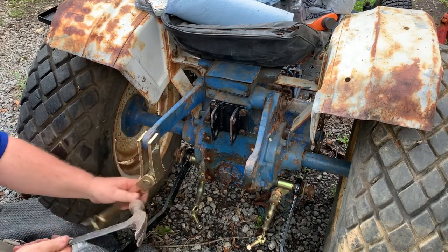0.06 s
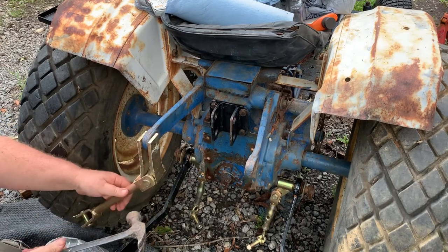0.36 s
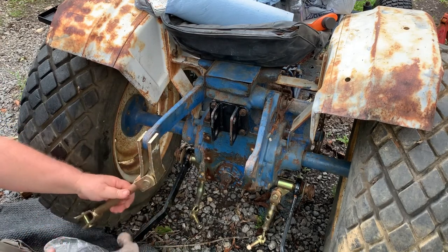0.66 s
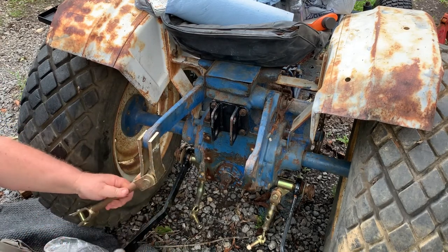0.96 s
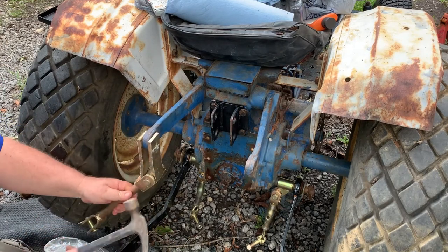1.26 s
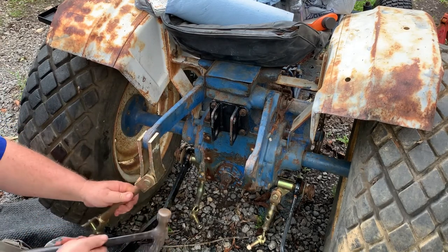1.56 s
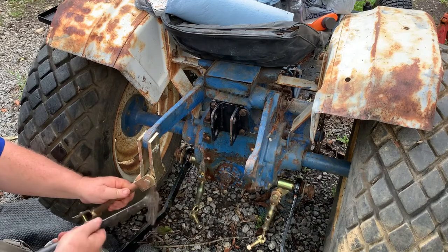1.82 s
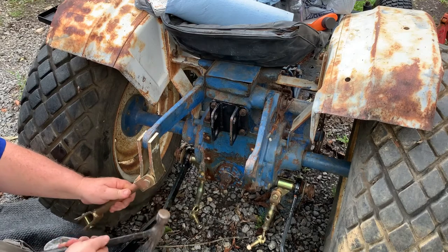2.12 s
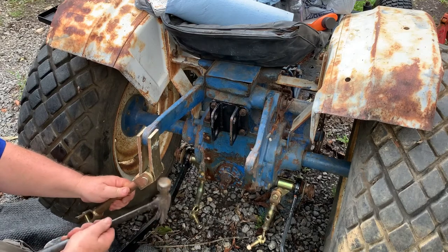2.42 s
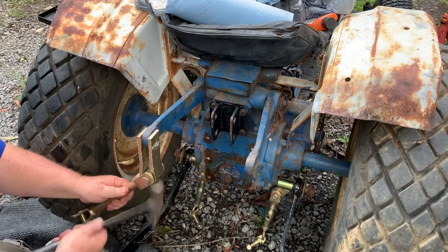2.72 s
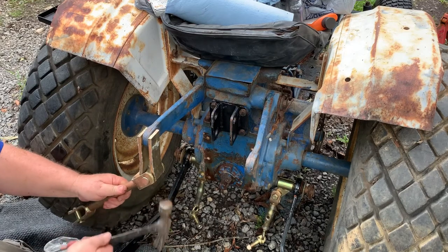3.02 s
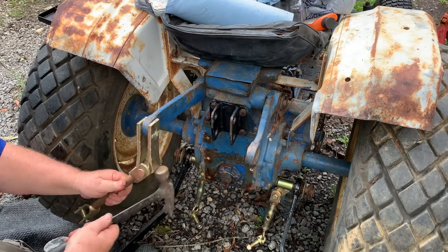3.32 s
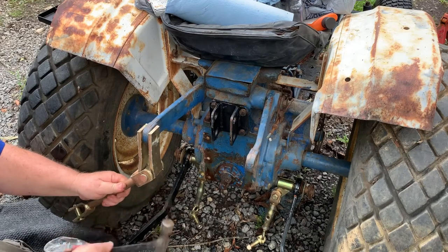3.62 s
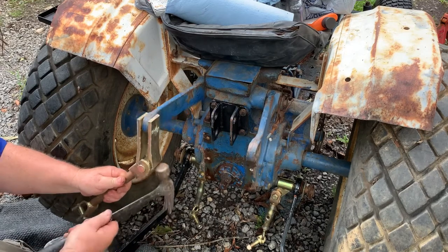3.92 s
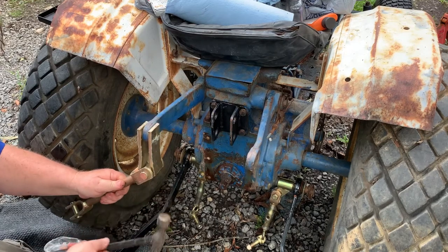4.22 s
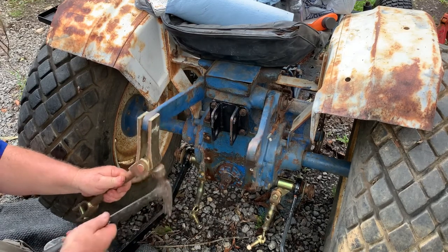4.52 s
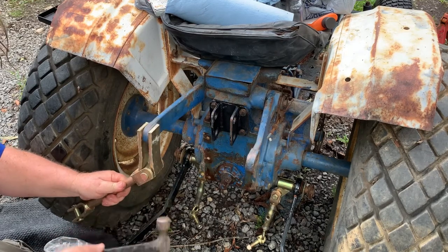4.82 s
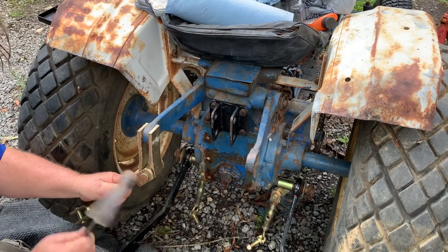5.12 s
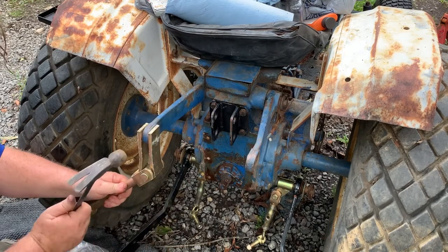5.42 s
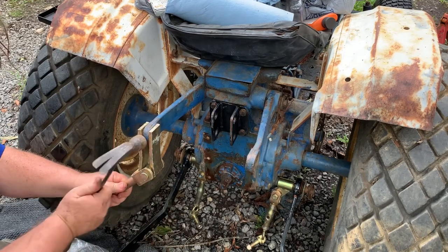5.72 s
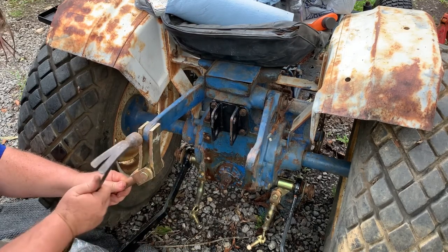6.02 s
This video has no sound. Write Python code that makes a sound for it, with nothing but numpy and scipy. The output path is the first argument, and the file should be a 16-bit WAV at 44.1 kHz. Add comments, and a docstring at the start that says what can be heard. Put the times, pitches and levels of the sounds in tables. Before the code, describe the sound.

Close to the microphone, a hammer hits steel on a tractor eight times, after a few soft clinks from a loose link. Six evenly paced strikes ping brightly on a pin, and after a brief gap two more clank on the lift arm. Each leaves the frame and fenders droning briefly, with small clinks between some blows. Outdoors, crickets trill faintly over the low rumble of a slightly echoing yard.

```python
"""A loose steel link clinks faintly in the hand, then a hammer taps a pin into a tractor's lift linkage.
Each of the eight close blows cracks, rings the steel and sets frame and fenders droning; glancing blows
make the hammer head sing, and the last two land mostly on the lift arm.
Behind them crickets trill near 7 kHz with their wings, over the low rumble of a quiet, faintly echoing yard."""
import sys
import numpy as np
from scipy import signal
from scipy.fft import rfft, irfft, next_fast_len
from scipy.io import wavfile

SR = 44100
rng = np.random.default_rng(int(sys.argv[2]) if len(sys.argv) > 2 else 0)


def generate_wav(sig):
    """Save sig (samples, or channels by samples) to the path in sys.argv[1] as 16-bit PCM at SR."""
    pcm = np.round(np.clip(np.atleast_2d(sig).T, -1, 1) * 32767).astype(np.int16)
    wavfile.write(sys.argv[1], SR, pcm)


N = 276066

# Hammer blows: start_s, force_db (0 = full swing), glance (0-1), on_arm (0-1), heft_db
BLOWS = [(1.764, -10.5, .5, 0.4, -0.5), (2.2224, -0.5, 0.85, 0.06, -3.5), (2.711, 0, 0.89, 0.2, 0.5),
         (3.1913, .5, 0.16, .05, -2.5), (3.732, 0, 0.26, 0.2, -11), (4.349, 1, 0.2, 0.4, -1),
         (5.6193, 0, 0, 0.91, -1.5), (5.9667, -1, 0, 0.92, 3)]
def hammer():
    """Steel on steel: a bright crack, ringing metal and a clunk, with the frame's drone as the tail."""
    out, tail_t = np.zeros((2, N)), np.arange(2 * SR) / SR
    t = tail_t[:SR // 2]
    for start_s, force_db, glance, on_arm, heft_db in BLOWS:
        hit = amp(-19 + force_db - on_arm) * crack(t, force_db, glance)
        hit += amp(-17.5 + force_db - 12 * on_arm) * pin_ring(t)
        hit += amp(-38.5 + force_db + 12 * on_arm) * arm_ring(t, waver_hz=87)
        hit += amp(-32 + 1.7 * force_db - 10.5 * on_arm) * link_ring(t)
        hit += amp(-24.5 + 3 * force_db + 7 * glance - 12.5 * on_arm) * head_ring(t, glance)
        hit += amp(-33.5 + heft_db) * clunk(t, stretch=0.33)
        add(out, start_s, swell(t, rise_s=0.0022) * hit)
        frame_db = -44.5 + 0.7 * force_db + 0.2 * heft_db  # the heavy frame follows the force less
        add(out, start_s, amp(frame_db) * frame_drone(tail_t))
    return out


# Tone of the crack: freq_hz, level_db
CRACK_TONE = [(60, -30), (200, -24.5), (700, -29.5), (1500, -5), (2100, -7), (2700, -0.5), (3200, -8),
              (4300, 0), (5300, -9.5), (7300, -5.5), (10000, -5), (13200, -11), (15500, -11),
              (16500, -35.5)]
# Decay of a steel contact: freq_hz, t60_s
CONTACT_DECAY = [(300, 0.2), (1500, 0.13), (4000, 0.18), (10000, 0.088), (14000, 0.05)]
def crack(t, force_db, glance):
    """The attack of a blow: brighter when hard, duller and longer when glancing."""
    stretch = 0.66 + 0.4 * glance
    brightness_db = 8.5 + 1.3 * force_db - 3 * glance
    chatter = 1 + np.exp(-(t / 0.0099) ** 2)  # loudest while the faces still touch and part
    return chatter * dense_modes(CRACK_TONE, CONTACT_DECAY, NEAR_IMAGE, len(t), stretch, brightness_db)


# Modes of the pin and its fork: pitch_hz, level_db, t60_s
PIN_MODES = [(1384, -6, .13), (1577, -14, .12), (2680, -1, .12), (2982, -8, .1), (3655, -10, .12),
             (3975, 0, .13), (4245, -4, .15), (4405, 0, .1), (4840, -8, .12), (6415, -11, .12),
             (6853, -2, .09), (7574, -4, .09), (9162, -5, .07), (9995, 0, .11), (10605, -9, .1),
             (10810, -3, .08), (15315, -10, .06)]
def pin_ring(t):
    """The struck pin and its fork give a short, bright ping."""
    return ring(PIN_MODES, t, detune=0.00081)


# Modes of the lift arm: pitch_hz, level_db, t60_s
ARM_MODES = [(494, -26, .55), (805, -18, .6), (900, -20, .55), (1180, -21, .35), (2610, -5, .075),
             (2680, 0, .065), (2740, -5, .07), (3480, -9, .12)]
def arm_ring(t, waver_hz=45):
    """Struck on its end, the arm clanks near 2.7 kHz while softer low modes hang on."""
    return ring(ARM_MODES, t, waver_hz=waver_hz)


# Modes of the hanging link: pitch_hz, level_db, t60_s
LINK_MODES = [(1400, -4, .15), (2850, -1, .1), (2966, 5, .12), (4242, 4, .17), (4420, -3, .13),
              (4840, -6, .12), (6487, -4, .09), (10050, -2, .28), (10660, -9, .15), (11210, -3, .08),
              (11410, -4, .27), (12120, -4, .15), (14648, -3, .33)]
def link_ring(t, brightness_db=0):
    """The jolted link rings thin and high."""
    return ring(LINK_MODES, t, brightness_db=brightness_db)


# Modes of the hammer head: pitch_hz, level_db, t60_s
HEAD_MODES = [(5629, -12, .2), (5830, -12, .17), (11407, -12, .19), (12395, -5, .09), (12430, 0, .11),
              (12490, -6, .09), (13948, -12, .12)]
def head_ring(t, glance):
    """The head sings near 12 kHz, holding longer after a glancing blow."""
    return ring(HEAD_MODES, t, scatter_db=0.5, waver_db=1.5, detune=0.0004, hold_s=0.04 * glance ** 2)


# Tone of the arm's clunk: freq_hz, level_db
CLUNK_TONE = [(120, -17.5), (350, -11.5), (700, -3.5), (1100, -5), (1550, -3), (2200, -9), (3500, -28),
              (8000, -61.5)]
def clunk(t, stretch):
    """The arm's dull midrange body under each contact."""
    return dense_modes(CLUNK_TONE, DRONE_DECAY, NEAR_IMAGE, len(t), stretch)


# Modes of frame, fenders and long steel bars: pitch_hz, level_db, t60_s
FRAME_MODES = [(161, -14, 1.3), (231, -7, 1.2), (318, -7, 1.1), (436, -5, .8), (468, -9, .63),
               (587, -8, .9), (668, -2, .56), (748, -7, .57), (807, 0, .57), (894, -5, .7), (947, -8, 1.3),
               (1044, -6, .65), (1244, -12, .5), (1400, -13, .7), (1545, -8, .5), (1631, -14, .7),
               (3915, -10, .7), (3975, -12, .6), (4400, -10, .7), (4450, -13, .8), (5630, -14, .55)]
# Tone of the frame's dense ringing: freq_hz, level_db
DRONE_TONE = [(30, -41), (70, -17.5), (160, -2.5), (450, 1.5), (850, 2), (1200, -6.5), (1550, -10),
              (2150, -11.5), (4300, -20.5), (8000, -31), (15000, -60)]
# Decay of the heavy steel: freq_hz, t60_s
DRONE_DECAY = [(100, 1.8), (400, 0.69), (900, 1), (1800, 0.67), (10000, .4)]
def frame_drone(t):
    """The shock spreads to frame and fenders, which drone on."""
    wash = amp(-3) * dense_modes(DRONE_TONE, DRONE_DECAY, FAR_IMAGE, len(t))
    tones = amp(-1) * ring(FRAME_MODES, t, waver_db=0.5, waver_hz=20)
    return swell(t, rise_s=0.0035) * (tones + wash)


# Knocks of the link in its fork: start_s, strength_db, brightness_db
CLINKS = [(0.042, -50.5, -14.5), (0.077, -48.5, 1), (0.0849, -38.5, 2), (0.145, -51.5, 4.5),
          (0.179, -52.5, 2.5), (0.4315, -53.5, 5), (0.453, -54.5, 0.5), (0.834, -54.5, -13),
          (1.6572, -52, -1.5), (1.837, -57, 1.5), (2.836, -51.5, -4.5), (2.8944, -48.5, -1),
          (3.4239, -47.5, 1), (3.979, -55.5, 0), (4.571, -46, -29), (4.606, -56.5, -27)]
def clinks():
    """The loose link knocks as it is lined up, and as it falls back after a blow."""
    out, t = np.zeros((2, N)), np.arange(SR // 2) / SR
    for start_s, strength_db, brightness_db in CLINKS:
        add(out, start_s, knock(t, strength_db, brightness_db))
    return out


# Tone of the link's click: freq_hz, level_db
CLICK_TONE = [(100, -3), (600, -9), (1400, -34), (2100, -17), (2900, -6), (4200, -1.5), (5300, -9.5),
              (6500, 1.5), (8500, -7), (10500, -1.5), (12100, -36.5), (13300, -29.5), (15200, -20),
              (16500, -71)]
def knock(t, strength_db, brightness_db):
    """One light contact: a click, the short ring of link and arm, and a soft clunk."""
    click = dense_modes(CLICK_TONE, CONTACT_DECAY, NEAR_IMAGE, len(t), brightness_db=brightness_db)
    click *= amp(-1) * (1 + np.exp(-t / 0.0077))  # extra snap at the front
    hand_damping = np.exp(-t / 0.032)
    link = amp(3.5) * hand_damping * link_ring(t, brightness_db)
    arm = amp(-6) * arm_ring(t)
    body = amp(-20 + 0.74 * strength_db) * clunk(t, stretch=0.41)
    return swell(t, rise_s=0.0013) * (amp(strength_db) * (click + link + arm) + body)


# Phase lead of the left port: freq_hz, lead_rad
PORT_PHASE = [(200, 0), (1400, .8), (4200, 2), (6500, 5.2), (8500, 3.1), (11600, -.4), (15200, -5.9)]
def microphone_ports(x):
    """Near sound reaches the two microphone ports out of step."""
    size = next_fast_len(N + SR)
    half_lead = curve_at(PORT_PHASE, np.fft.rfftfreq(size, 1 / SR)) / 2
    phase_shift = np.exp(1j * np.array([half_lead, -half_lead]))
    return irfft(rfft(x, size) * phase_shift, size)[:, :N]


# Tone of the yard's echo: freq_hz, level_db
ECHO_TONE = [(200, 11), (1500, 3.5), (4200, -5.5), (7000, -9), (10000, -6), (15000, 6.5)]
# Decay of the echo: freq_hz, t60_s
ECHO_DECAY = [(500, 0.26), (2000, 0.55), (4200, 1), (10000, 0.52), (15000, 0.069)]
def yard_echo(x, wet_db=-24):
    """Machines, trees and walls around the yard scatter a faint tail back."""
    tail = dense_modes(ECHO_TONE, ECHO_DECAY, FAR_IMAGE, SR) * swell(np.arange(SR) / SR, rise_s=0.0017)
    tail /= np.linalg.norm(tail[0])
    return amp(wet_db) * signal.fftconvolve(x, tail, axes=1)[:, :N]


def crickets(pitch_hz=7010, spread_hz=380, width_hz=140, pulse_depth=0.8, count=10):
    """Each cricket's wing strokes pulse a narrow resonance; together they blur into one trill."""
    t, out = np.arange(N) / SR, np.zeros((2, N))
    radius = np.exp(-np.pi * width_hz / SR)
    for offset in np.linspace(-1, 1, count):
        stroke_hz = rng.uniform(29, 120)
        strokes = 1 + pulse_depth * np.sin(2 * np.pi * (stroke_hz * t + rng.random()))
        rasp = rng.standard_normal((2, N)) * strokes
        pole = radius * np.exp(2j * np.pi * (pitch_hz + spread_hz * offset) / SR)
        wing = signal.lfilter([1], np.poly([pole, pole]), rasp).real
        out += amp(-8 * offset ** 2) * unit_rms(wing)  # the middle pitches are loudest
    return insect_rise(start_db=-69.5) * unit_rms(out)


# Tone of the yard's air: freq_hz, level_db
AIR_TONE = [(15, -51), (30, -27.5), (55, 2.5), (110, 0), (170, -11), (400, -21.5), (800, -19.5),
            (1300, -26.5), (2000, -29), (3000, -35), (4800, -34), (5800, -25), (8000, -35), (9000, -54.5)]
# Fader ride on the air: time_s, fader_db
AIR_RIDE = [(0.0, -67.5), (1.29, -74), (1.64, -70.5), (4.15, -66.5), (5.27, -70), (5.82, -64), (6.26, -70)]
def yard_air(trim_db=2.5):
    """A bed of low outdoor rumble and faint hiss, leaning right."""
    ride_db = np.interp(np.arange(N) / SR, *np.transpose(AIR_RIDE))
    return amp(ride_db + trim_db) * noise(AIR_TONE, FAR_IMAGE, N) * amp([[-1.8], [1.8]])


# Tone of the far insect: freq_hz, level_db
BUZZ_TONE = [(8500, -27), (10000, -2.5), (11100, -4), (12300, -0.5), (13300, -24.5), (16000, -25)]
def insect_buzz():
    """A thin, high insect buzz far off."""
    return insect_rise(start_db=-98.5) * noise(BUZZ_TONE, FAR_IMAGE, N)


def insect_rise(start_db, db_per_s=0.86):
    """The gain of a chorus that slowly grows."""
    return amp(start_db + db_per_s * np.arange(N) / SR)


# Stereo image of near sound: freq_hz, correlation (0-1)
NEAR_IMAGE = [(200, .95), (1500, 0.8), (4000, 0.3), (7000, 0), (10000, 1)]
# Stereo image of scattered sound: freq_hz, correlation (0-1)
FAR_IMAGE = [(100, .88), (300, 0.7), (700, 0), (1500, 0), (8000, 0.3)]
def noise(tone, image, size):
    """Coloured stereo noise of rms 1, its two sides partly alike."""
    hz = np.fft.rfftfreq(size, 1 / SR)
    left, independent = rfft(rng.standard_normal((2, size)))
    correlation = curve_at(image, hz)
    right = correlation * left + np.sqrt(1 - correlation ** 2) * independent
    return unit_rms(irfft(np.array([left, right]) * amp(curve_at(tone, hz)), size))


def dense_modes(tone, decay, image, size, stretch=1, brightness_db=0):
    """Modes too many to count: noise whose bands each die at their own speed, slowed by stretch."""
    hz, t, bands = signal.stft(noise(tone, image, size), SR, nperseg=256)
    fall_db = -60 * t / (stretch * curve_at(decay, hz)[:, None])
    shelf_db = brightness_db * treble_share(hz)[:, None]
    return signal.istft(bands * amp(fall_db + shelf_db), SR, nperseg=256)[1][:, :size]


def ring(modes, t, scatter_db=4, waver_db=5.5, waver_hz=45, detune=0.0013, brightness_db=0, hold_s=0):
    """Dying sines, balanced and detuned anew on each hit; the shifting contact makes them waver."""
    hz, level_db, t60_s = np.transpose(modes)[:, :, None]
    hz = hz * (1 + detune * rng.standard_normal(hz.shape))
    knots_s = np.arange(200) / waver_hz
    waver = np.array([np.interp(t, knots_s, row) for row in rng.standard_normal((len(modes), 200))])
    struck_db = level_db + brightness_db * treble_share(hz) + scatter_db * rng.standard_normal(hz.shape)
    decay = np.exp(-np.log(1000) * np.maximum(t - hold_s, 0) / t60_s)
    sines = np.sin(2 * np.pi * (hz * t + rng.random(hz.shape)))
    partials = amp(struck_db + waver_db * waver) * decay * sines
    return partials.sum(0) * np.sqrt(2 / np.sum(amp(level_db) ** 2))


def swell(t, rise_s):
    """A soft attack: vibration needs a moment to spread."""
    return 1 - np.exp(-(t / rise_s) ** 2)


def treble_share(hz):
    """The share of a brightness boost that a frequency gets."""
    return curve_at([(2000, 0), (10000, 0.83)], hz)


def curve_at(points, hz):
    """A table's value at hz, joined on a log-frequency axis."""
    freq_hz, value = np.transpose(points)
    return np.interp(np.log(hz + 1), np.log(freq_hz), value)


def amp(db):
    return 10 ** (np.asarray(db) / 20)


def unit_rms(x):
    return x / np.sqrt(np.mean(x ** 2) + 1e-20)


def add(mix, start_s, sound):
    part = mix[:, round(start_s * SR):][:, :sound.shape[-1]]
    part += sound[..., :part.shape[1]]


def scene():
    """Close metalwork up front; echo, insects and air behind."""
    metal = hammer() + clinks()
    close = microphone_ports(metal) * amp([[-0.4], [0.4]])
    return close + yard_echo(metal) + crickets() + yard_air() + insect_buzz()


def record(dry, low_cut_hz=42, high_cut_hz=16300):
    """Master chain: cut the deepest rumble, round off the peaks and limit the top end."""
    low_cut = signal.butter(3, low_cut_hz, "high", fs=SR, output="sos")
    high_cut = signal.firwin(255, high_cut_hz, window=("kaiser", 9), fs=SR)
    rounded = np.tanh(signal.sosfilt(low_cut, dry))
    return signal.oaconvolve(rounded, high_cut[None], "same")


dry = scene()
out = record(dry)
generate_wav(out)
```